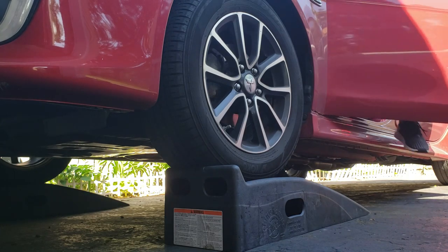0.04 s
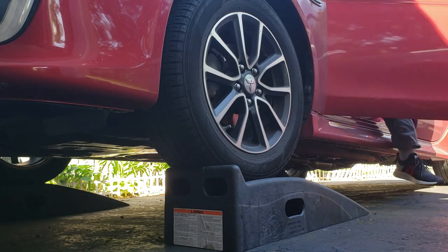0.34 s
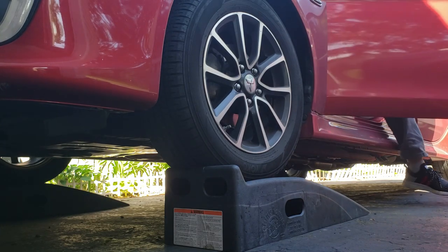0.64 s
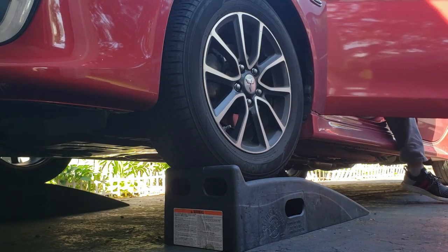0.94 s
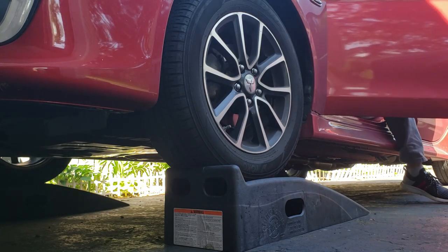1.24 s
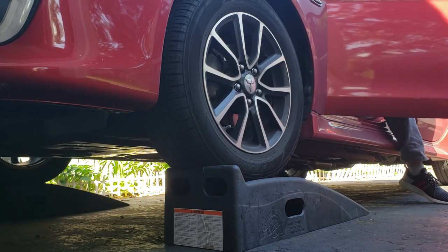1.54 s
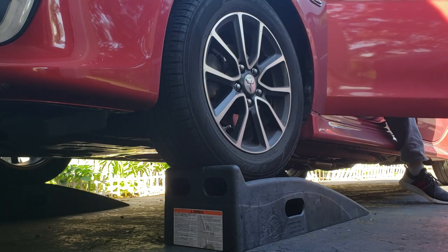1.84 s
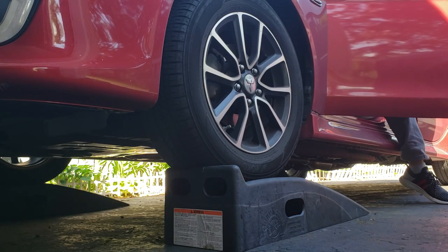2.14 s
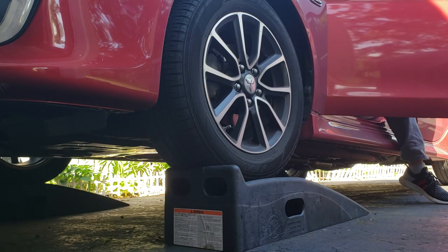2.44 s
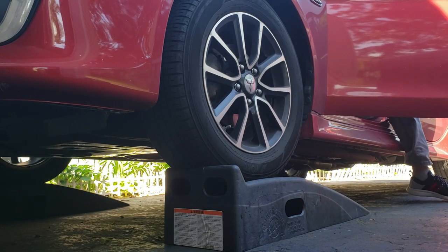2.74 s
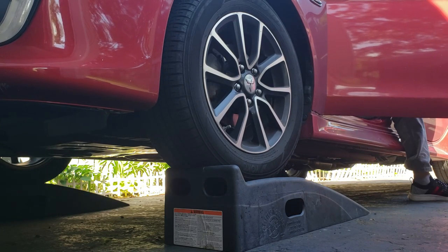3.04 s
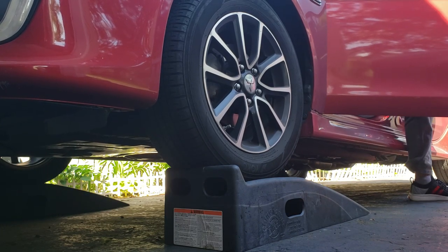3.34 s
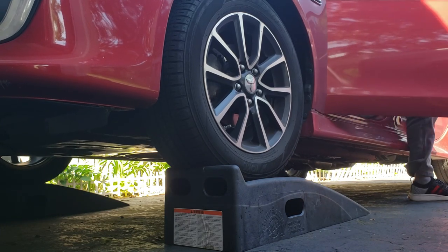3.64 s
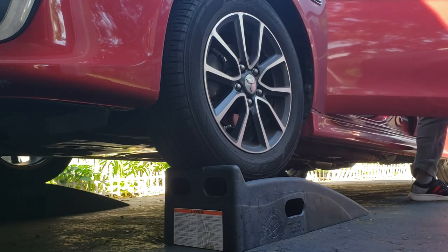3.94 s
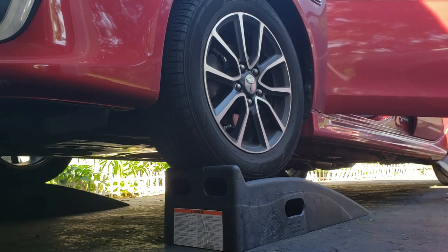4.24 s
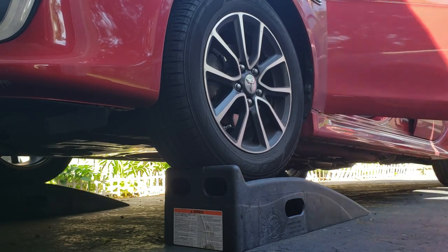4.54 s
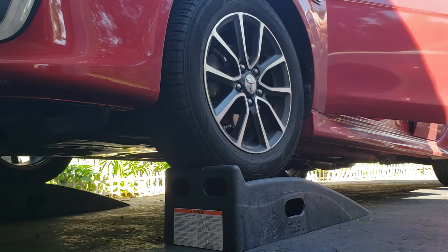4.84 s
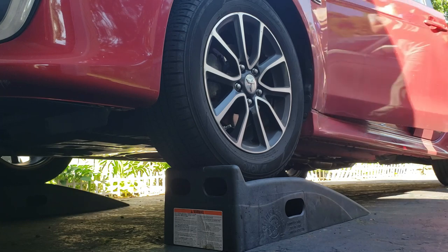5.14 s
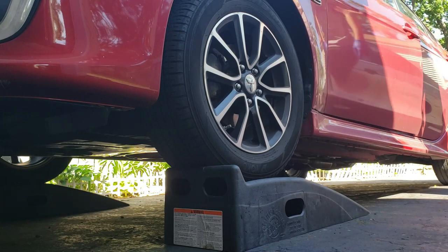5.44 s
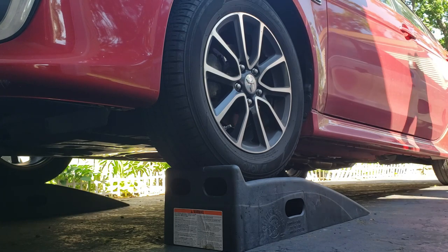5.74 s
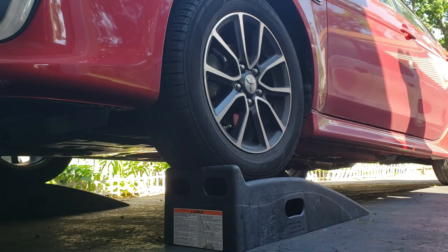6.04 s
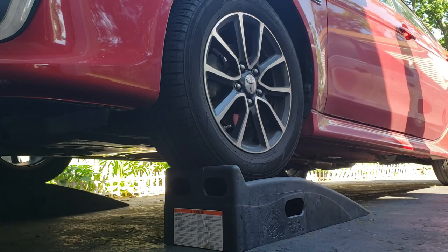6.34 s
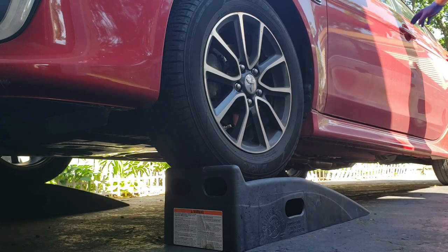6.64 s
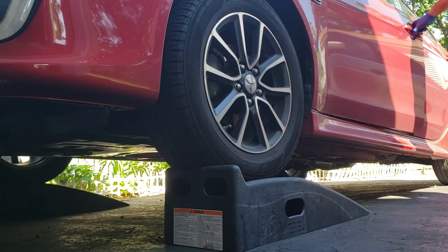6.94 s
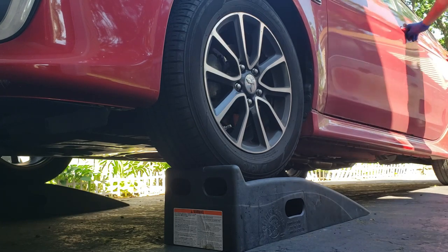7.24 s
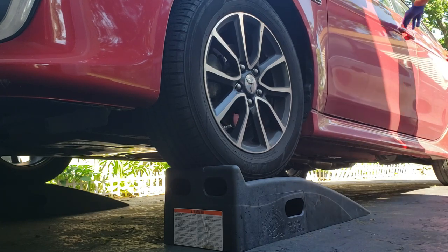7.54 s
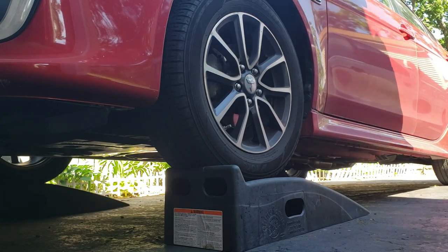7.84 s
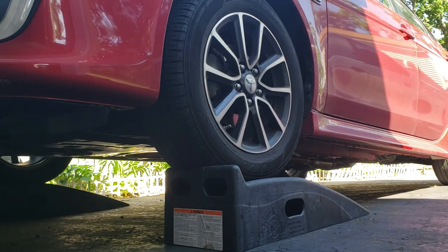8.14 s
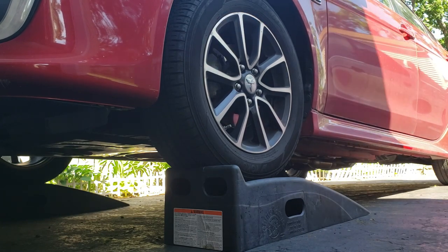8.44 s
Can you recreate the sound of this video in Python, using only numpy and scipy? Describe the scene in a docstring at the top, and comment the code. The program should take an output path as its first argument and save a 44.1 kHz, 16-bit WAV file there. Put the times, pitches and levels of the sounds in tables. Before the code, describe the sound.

A car's bonnet release pops with a ringing steel clunk, followed by a smaller snap. Someone steps over gritty concrete with jingling keys, lets the door close lightly, pulls the handle and then shuts it hard, the latch ringing over a low thud. The sounds are close, heard from beside the front wheel under an outdoor shelter, with soft traffic rumble, a faint far horn at the start and chirping birds behind.

```python
"""Traffic rumbles, a far horn sounds and birds chirp, heard beside the front wheel of a car on ramps
under a shelter. The bonnet catch pops and its lever snaps back, each blow exciting the modes of the
steel panel. Someone steps over gritty concrete, clothes rustling and keys colliding, swings the door
to, pulls the handle and shuts it firmly: the latch rings and the air trapped in the cabin booms.
Shelter and yard return the near sounds as reverberation."""
import sys
import numpy as np
from scipy import signal
from scipy.fft import rfft, irfft, next_fast_len
from scipy.io import wavfile
from scipy.ndimage import uniform_filter1d

SR = 44100
rng = np.random.default_rng(int(sys.argv[2]) if len(sys.argv) > 2 else 0)


def file_out(sig):
    """Save sig as 16-bit WAV at sys.argv[1]."""
    # one column per channel
    cols = np.atleast_2d(sig).T
    # limit, then scale
    lim = np.clip(cols, -1, 1)
    pcm = np.round(lim * 32767).astype(np.int16)
    wavfile.write(sys.argv[1], SR, pcm)


N = 383669
T = np.arange(N) / SR

# Levels are relative: each source applies further gains.
# coherence of the two channels: frequency_hz, correlation
COHERENCE = [(60, 1), (130, 0.98), (290, 0.94), (640, 0.83), (1400, 0), (16000, 0)]
# traffic spectrum, partials of the horn and of a far machine: frequency_hz, level_db
TRAFFIC_SPECTRUM = [(20, -30), (32, -12.5), (42, -1.5), (60, 1.5), (80, 1.5), (110, -3), (160, -10),
                    (215, -14.5), (335, -21.5), (480, -25.5), (760, -29), (1150, -31), (1700, -40.5),
                    (2500, -43.5), (3800, -40), (5500, -59.5), (7200, -47.5), (8400, -66.5), (12200, -54.5),
                    (16000, -54.5)]
HORN_PARTIALS = [(399, 1), (802, -2), (1200, -12)]
HUM_PARTIALS = [(769, -78.5), (462, -79)]
# envelopes of the background sources: time_s, level_db
TRAFFIC_ENVELOPE = [(0, -50.5), (1.0, -53), (2.2, -53), (3.3, -54), (4.7, -54.5), (5.3, -51.5), (6.4, -51),
                    (7.8, -54), (8.3, -53.5), (8.7, -50.5)]
HORN_ENVELOPE = [(0, -69), (.3, -66), (.6, -68.5), (.85, -80), (1.1, -110)]
DRONE_ENVELOPE = [(7.6, -89), (8.0, -52.5), (8.3, -51.5), (8.42, -46.5), (8.5, -43), (8.7, -44.5)]
FLOCK_ENVELOPE = [(0, -76), (.9, -79.5), (1.25, -90), (1.8, -76.5), (2.6, -93), (3.2, -76.5), (4.35, -92),
                  (5, -81), (6.3, -80), (6.55, -92.5), (8.1, -80), (8.7, -98)]
# calls of the nearest birds: start_s, pitch_hz, level_db
BIRD_CALLS = [(0.031, 4100, -68), (.16, 2750, -72), (.48, 4340, -70), (.62, 3780, -72.5),
              (.86, 4200, -70.5), (1.01, 3324, -73.5), (1.39, 4700, -71.5), (1.47, 6900, -79),
              (1.59, 3500, -65.5), (1.809, 3400, -67), (1.97, 4400, -71.5), (2.09, 3400, -70),
              (2.319, 3200, -70.5), (3.749, 3230, -81), (4.701, 3850, -70.5), (4.93, 3500, -71),
              (5.11, 4000, -66.5), (5.441, 3700, -68.5), (5.85, 4200, -70), (6.691, 4050, -69.5),
              (7.949, 2640, -75), (8.05, 3950, -73.5)]
# shoe scuffs and soft rustle of clothes (the faint, long rows at 5.0, 7.74 and 8.36 s):
# start_s, rise_s, fall_s, level_db, dull_weight_db
SCUFFS_AND_RUSTLES = [(1.7, .007, .1, -75.5, 8.5), (3.577, 0.0089, .073, -48.5, -3.5),
                      (3.96, 0.025, 0.32, -67, -10.5), (4.057, 0.004, 0.22, -74, 10.5),
                      (4.493, 0.012, 0.2, -68.5, 0), (4.55, 0.072, 0.11, -62, 10),
                      (5.0, 0.24, 0.31, -69, -8), (5.729, 0.0063, 0.051, -40, -25),
                      (5.85, 0.034, 0.27, -66.5, -10), (5.97, 0.27, 0.12, -56.5, -27),
                      (7.74, 0.03, 1, -71.5, -17), (8.31, 0.017, 0.14, -65.5, 1.5), (8.36, 0.13, 1, -81, 6)]
# spectra of contact noise: frequency_hz, level_db
HEEL_SPECTRUM = [(120, -20), (350, 2.5), (700, -7.5), (1200, -7.5), (1900, -7), (3000, -7.5), (8000, -22)]
SOLE_SPECTRUM = [(900, -17), (1900, -11), (2600, -2.5), (3700, -3.5), (5500, -5), (7200, -4.5),
                 (8500, -19.5), (15000, -16.5)]
GRIT_SPECTRUM = [(2000, -10.5), (5000, -3), (7000, -10.5), (9000, -10), (12000, -7.5), (15500, -13.5)]
KEY_SPECTRUM = [(1500, -11.5), (3200, -1), (5200, -2), (7100, -4.5), (9000, -9), (12000, -5.5), (15500, -6)]
# jingles of the bunch of keys: start_s, length_s, level_db
JINGLES = [(4.186, 0.047, -56), (6.043, .15, -48)]
# single key clinks, blows on the latch, booms as the seals close: start_s, level_db
KEY_CLINKS = [(2.976, -63), (3.02, -64), (4.023, -56), (4.178, -56), (4.247, -58), (6.008, -51.5),
              (6.017, -42), (6.199, -41.5), (7.874, -52), (8.378, -59.5)]
LATCH_HITS = [(5.603, -29), (6.934, -33.5), (7.341, -27.5)]
CABIN_BOOMS = [(5.725, -45), (7.341, -16), (7.379, -20.5)]
# rattles of the pawl in the latch: start_s, level_db, t60_s
PAWL_HITS = [(5.705, -34, 0.2), (6.933, -32.5, 0.019), (7.071, -47, 0.023)]
# normal modes: frequency_hz, level_db, t60_s
KEY_MODES = [(3200, 1, .025), (4200, -2, .025), (5750, -6, .04), (6950, 0, .06), (7300, -3, .05),
             (10900, -5, .07), (11600, -7, .05), (12500, -2, .07), (13350, -3, .07), (14300, -7, .05),
             (15400, -4, .05)]
LATCH_MODES = [(582, -1, .07), (790, 0, .048), (1380, -2, .035)]
PAWL_MODES = [(2610, -1, .07), (2950, -3, .08), (3330, -1, .09), (4360, 2, .025), (5500, -5, .04)]
BONNET_MODES = [(75, -10.5, .4), (81.2, -11, 0.44), (113.3, -8.5, 0.54), (133.4, -10.5, 0.57),
                (191.8, -9, 0.49), (238, 1, 0.24), (245, 9.5, 0.25), (282, 0.5, 0.23), (426, -1.5, 0.18),
                (456.9, -3, 0.34), (669, -4.5, .28), (709, -6, 0.25), (977, -15, 0.44), (1144, -5.5, 0.16),
                (1250, -30.5, 0.27), (1290, -10, .3), (1410, -12.5, 0.26), (1550, -12, .2),
                (4400, -13, 0.31), (7700, -12.5, .25), (6900, -14.5, 0.267), (7900, -16.5, .25)]
DOOR_MODES = [(71.8, -5, 0.34), (104, 0, 0.1), (127.3, 1, 0.15), (162.2, -2.5, 0.28), (185.4, 3, 0.15),
              (225.4, -3.5, 0.12), (301.5, -2, 0.067), (380, -10, 0.33), (453, -6.5, 0.12),
              (571, -8.5, 0.062), (662, -10, 0.07), (791, -20, 0.18), (1096, -11, 0.11), (1190, -21, 0.13),
              (1280, -10, 0.094)]
# dense ring of sheet metal and catch: frequency_hz, level_db
BONNET_SPECTRUM = [(60, 1.5), (300, 10), (700, -5.5), (1300, -8.5), (2100, -11), (2550, -19), (3200, -12),
                   (4500, -1), (5700, -8.5), (7300, -3.5), (8500, -24), (15500, -20.5)]
DOOR_SPECTRUM = [(50, 13.5), (120, 21.5), (300, 11), (700, -2.5), (1400, -4.5), (2700, -15), (4400, -6.5),
                 (5800, -11), (7000, -17.5), (8500, -37), (15500, -32)]
# boundaries between the five bands of a blow: frequency_hz
BAND_EDGES_HZ = [200, 900, 3000, 8000]
# weights of those bands: boom_db, body_db, clank_db, click_db, tick_db
BONNET_BANDS_DB = [1.4, -0.086, 0.28, 0.87, -0.74]
DOOR_BANDS_DB = [0.078, 0.26, 0.27, -1.1, -1.3]
# blows on the panels: start_s, force_db, boom_over_body_db, hardness_db_per_band, ring_t60_s
BONNET_BLOWS = [(2.372, -57, 14, -7, 0.99), (2.407, -27, 8, -0.96, 0.087), (2.419, -19.5, -5.5, -11, 0.28),
                (2.440, -27, 3.5, -7, 0.26), (2.480, -34.5, 0.5, -11.5, 0.52), (2.681, -37, -11, -1.5, 0.2),
                (2.696, -31, -10, -8.5, 0.36)]
DOOR_BLOWS = [(5.199, -53.5, -14, -16, 0.12), (5.555, -42, -16, -10, 0.74), (5.602, -32, -3.5, -8, 0.31),
              (5.725, -48, 9.5, -6, 0.78), (6.885, -49, 9.5, -7.5, 0.11), (6.894, -35.5, -8.5, -13, 0.74),
              (6.934, -31.5, 3.5, -10.5, 0.063), (6.952, -38, 4, -7.5, 0.41), (7.071, -29, 0.5, -9.5, 0.19),
              (7.122, -42.5, 6.5, -10, 0.47), (7.328, -31.5, -11, -6, 0.15),
              (7.339, -26.5, -22, -5.5, 0.21), (7.345, -23, 5, -13.5, 0.18), (7.379, -32, 10.5, -9, 0.29),
              (8.309, -49, -6, -12.5, 0.08)]


def undb(db):
    """Amplitude ratio of a level in decibels."""
    return 10 ** (np.asarray(db) / 20)


def unit(x):
    """Normalisation to rms 1."""
    return x / np.sqrt(np.mean(x ** 2) + 1e-20)


def fade(t, t60):
    """Exponential damping, 60 dB down after t60 seconds."""
    return np.exp(-np.log(1000) * t / max(t60, 1e-3))


def onset(t, rise_s):
    """First-order build-up towards 1."""
    return 1 - np.exp(-t / rise_s)


def curve(rows, at_s=T):
    """Linear interpolation of rows of time_s, value."""
    return np.interp(at_s, *np.transpose(rows))


def on_bins(points, size):
    """Log-frequency interpolation of rows of frequency_hz, value at each Fourier bin."""
    hz, value = np.transpose(points)
    return np.interp(np.log(np.arange(size // 2 + 1) * SR / size + 1), np.log(hz), value)


def colour(x, spectrum):
    """Filtering by multiplication in the frequency domain."""
    size = x.shape[-1]
    return irfft(rfft(x) * undb(on_bins(spectrum, size)), size)


def diffuse_noise(size):
    """A diffuse field at two points: coherent in the bass, independent in the treble."""
    mid, side = rfft(rng.standard_normal((2, size)))
    alike = np.clip(on_bins(COHERENCE, size), -1, 1)
    mid, side = mid * np.sqrt(1 + alike), side * np.sqrt(1 - alike)
    return unit(irfft(np.array([mid + side, mid - side]), size))


def shaped_noise(size, spectrum):
    """Filtered diffuse noise of rms 1."""
    return unit(colour(diffuse_noise(size), spectrum))


def add(out, start_s, x):
    """Superposition of x on out from start_s."""
    start = max(int(start_s * SR), 0)
    out[:, start:start + x.shape[-1]] += x[..., :N - start]


def pan(left_db):
    """Channel gains for a level difference, left minus right."""
    return undb(np.array([[left_db], [-left_db]]) / 2)


def from_right(x, lag_samples=12):
    """Path difference: sound from the right reaches the left channel later."""
    return np.array([np.pad(x[0], (lag_samples, 0))[:N], x[1]])


def scattered(start_s, length_s, per_s):
    """Stratified random times, one in each slot of about 1 / per_s seconds."""
    count = max(round(length_s * per_s), 1)
    return start_s + length_s * (np.arange(count) + rng.random(count)) / count


def ring(modes, t, scatter_db):
    """Free vibration as a sum of damped modes: random weights, phases scattered more in the treble."""
    out = 0
    for hz, db, t60 in modes:
        weight, lag, start = rng.standard_normal(3)
        phase = (2 * start + np.array([[1], [-1]]) * lag) * min(hz / 1500, 2)
        out = out + undb(db + scatter_db * weight) * fade(t, t60) * np.sin(2 * np.pi * hz * t + phase)
    return out


def reverberation(x, t60, top_t60):
    """Convolution with diffuse reflections of unit energy that die sooner in the treble."""
    t = np.arange(SR * 3 // 2) / SR
    noise = diffuse_noise(len(t))
    low = colour(noise, [(2000, -6.5), (12000, -16)])
    tail = (low * fade(t, t60) + (noise - low) * fade(t, top_t60)) * np.clip(t / 0.017, 0, 1)
    return signal.fftconvolve(x, unit(tail) / np.sqrt(len(t)), axes=1)[:, :N]


def traffic(waver, waver_db=1.04):
    """Broadband rumble under slow amplitude modulation."""
    rumble = shaped_noise(next_fast_len(N), TRAFFIC_SPECTRUM)[:, :N]
    return rumble * undb(curve(TRAFFIC_ENVELOPE) + waver_db * waver)


def horn(clock):
    """A far horn: three nearly harmonic partials under one envelope."""
    tone = unit(sum(undb(db) * np.sin(2 * np.pi * hz * clock) for hz, db in HORN_PARTIALS))
    return tone * undb(curve(HORN_ENVELOPE))


def machine_hum(clock, waver, waver_db=3.2):
    """A far machine: two partials under slow amplitude modulation."""
    return sum(undb(db + waver_db * waver) * np.sin(2 * np.pi * hz * clock) for hz, db in HUM_PARTIALS)


def yap(peak_s=0.15, width_s=0.056, level_db=-56):
    """One distant yap: a formant of noise in a Gaussian envelope."""
    formant = [(350, -23), (560, -2), (850, 0), (1050, -7), (1500, -29), (4000, -56)]
    voice = shaped_noise(next_fast_len(N), formant)[:, :N]
    return voice * undb(level_db) * np.exp(-((T - peak_s) / width_s) ** 2)


def drone(pitch_hz=48.4):
    """A low pure tone that swells near the end."""
    return unit(np.sin(2 * np.pi * pitch_hz * T)) * undb(curve(DRONE_ENVELOPE))


def street(pitch_drift=0.0034):
    """Superposition of far sources; one slow random modulation sways traffic, horn and hum."""
    waver = np.interp(T, np.linspace(0, T[-1], 60), rng.standard_normal(60))
    clock = np.cumsum(1 + pitch_drift * waver) / SR
    return traffic(waver) + horn(clock) + machine_hum(clock, waver) + yap() + drone()


def birds(chirp_s=.11, arch=.12, flock_hz=4250, flock_octaves=.8):
    """Frequency modulation makes raspy arched chirps; a longer answer to each is heard as reflections."""
    near, far = np.zeros((2, 2, N))
    flock = [(s, flock_hz * 2 ** (flock_octaves * rng.triangular(-1, 0, 1)), curve(FLOCK_ENVELOPE, s))
             for s in scattered(0, T[-1], per_s=18)]
    for start_s, pitch_hz, db in BIRD_CALLS + flock:
        glide = .07 * rng.standard_normal()
        for out, stretch, warble in ((near, 1, .04), (far, 2.2, .13)):
            progress = np.linspace(0, 1, int(stretch * chirp_s * SR))
            swell = np.sin(np.pi * progress)
            rasp = unit(uniform_filter1d(rng.standard_normal(SR // 2), size=50))[:len(progress)]
            hz = pitch_hz * (1 + glide * (progress - .5) + warble * rasp + arch * (swell - 2 / np.pi))
            chirp = 2 * swell * np.sin(2 * np.pi * np.cumsum(hz) / SR)
            add(out, start_s - (stretch - 1) * chirp_s / 2, undb(db - 2) * chirp)
    return undb(-5) * near + reverberation(near + undb(-4) * far, t60=.5, top_t60=0.46)


def shoes_and_clothes(grit_db=-7.5, grain_samples=32):
    """Friction noise: shoe scuffs and soft rustle of clothes, three grainy layers following pressure."""
    forces = np.zeros((3, 2, N))
    t = np.arange(SR * 3 // 2) / SR
    for start_s, rise_s, fall_s, db, dull_db in SCUFFS_AND_RUSTLES:
        pressure = undb(db) * np.minimum(t / rise_s, 1) * np.exp(-2 * np.maximum(t - rise_s, 0) / fall_s)
        for force, share_db in zip(forces, (dull_db, 0, grit_db)):
            add(force, start_s, undb(share_db) * pan(left_db=0.5) * pressure)
    out, size = 0, next_fast_len(N)
    textures = (HEEL_SPECTRUM, 3), (SOLE_SPECTRUM, 3), (GRIT_SPECTRUM, 1.5)
    for force, (spectrum, spread_db) in zip(forces, textures):
        grain_db = spread_db * np.minimum(rng.exponential(size=size // grain_samples + 1), 4)
        grains = np.repeat(undb(grain_db), grain_samples)[:size]
        out = out + force * unit(colour(diffuse_noise(size) * grains, spectrum))[:, :N]
    return out


def keys(rattle_db=-8, rattle_s=0.016):
    """Each collision excites a bright tick and randomly detuned modes; two weaker contacts follow."""
    out, t = np.zeros((2, N)), np.arange(SR // 8) / SR
    jingling = [(s, db + 0.5 * rng.standard_normal())
                for start_s, length_s, db in JINGLES for s in scattered(start_s, length_s, per_s=50)]
    for start_s, db in KEY_CLINKS + jingling:
        for rebound in (False, True, True):
            tick = shaped_noise(len(t), KEY_SPECTRUM) * fade(t, t60=0.034)
            modes = [(hz * (1 + .02 * rng.standard_normal()), level, t60) for hz, level, t60 in KEY_MODES]
            clink = (undb(-4) * ring(modes, t, scatter_db=4) + undb(6) * tick) / 2
            add(out, start_s + rebound * rattle_s * rng.random(), undb(db + rattle_db * rebound) * clink)
    return out


def latch():
    """Impacts excite the modes of the latch and of its pawl, which also rattles with a burst of noise."""
    out, t = np.zeros((2, N)), np.arange(SR // 2) / SR
    for start_s, db in LATCH_HITS:
        add(out, start_s, undb(db) * ring(LATCH_MODES, t, scatter_db=1.5) * onset(t, rise_s=0.00041))
    for start_s, db, t60 in PAWL_HITS:
        rattle = ring(PAWL_MODES, t, scatter_db=1.5) + undb(-1) * shaped_noise(len(t), SOLE_SPECTRUM)
        add(out, start_s, undb(db) * rattle * fade(t, t60) * onset(t, rise_s=0.0017))
    return out


def cabin_boom(pitch_hz=47.5, t60=.23):
    """Cavity resonance: air trapped by the door seals rings in one low damped mode."""
    out, t = np.zeros((2, N)), np.arange(SR // 2) / SR
    boom = np.sin(2 * np.pi * pitch_hz * t) * fade(t, t60) * onset(t, rise_s=0.0076)
    for start_s, db in CABIN_BOOMS:
        add(out, start_s, undb(db) * boom)
    return out


def struck_panel(blows, bands_db, modes, spectrum, dense_db, crack_db, crack_t60, bloom_s,
                 bass_t60_ratio, left_db, treble_left_db):
    """Impact on steel: a crack, a dense ring and modes. Harder blows are brighter; bass builds last."""
    out, t = np.zeros((2, N)), np.arange(SR * 3 // 4) / SR
    edges_hz = [42] + BAND_EDGES_HZ + [18000]
    filters = [signal.butter(2 if k < 2 else 4, edges_hz[k:k + 2], "band", fs=SR, output="sos")
               for k in range(5)]
    for start_s, force_db, boom_db, hardness_db, t60 in blows:
        dense = undb(dense_db) * shaped_noise(len(t), spectrum)
        tone = ring(modes, t, scatter_db=3.5) * fade(t, 5 * t60)
        for k, share_db in enumerate(bands_db):
            db = force_db + share_db + (hardness_db * (k - 1) if k else boom_db)
            decay = fade(t, t60 * (bass_t60_ratio if k < 2 else 1)) + undb(crack_db) * fade(t, crack_t60)
            vibration = (tone + dense * decay) * onset(t, bloom_s / (k + 1) ** 2)
            band = signal.sosfilt(filters[k], vibration)
            band /= np.sqrt(np.mean(band[:, :SR // 40] ** 2))  # the first 25 ms set the level
            add(out, start_s, band * undb(db) * pan(left_db + treble_left_db * (k > 2)))
    return out


def door():
    """Impacts set the door panel vibrating as it is pushed to, opened by its handle and slammed."""
    return struck_panel(DOOR_BLOWS, DOOR_BANDS_DB, DOOR_MODES, DOOR_SPECTRUM,
                        dense_db=-1, crack_db=3, crack_t60=0.072, bloom_s=0.0026,
                        bass_t60_ratio=0.99, left_db=-0.5, treble_left_db=1.5)


def bonnet():
    """Impacts of the catch and its lever set the bonnet vibrating, a little to the left."""
    return struck_panel(BONNET_BLOWS, BONNET_BANDS_DB, BONNET_MODES, BONNET_SPECTRUM,
                        dense_db=9, crack_db=-2.5, crack_t60=0.064, bloom_s=.014,
                        bass_t60_ratio=0.69, left_db=1.1, treble_left_db=4)


def scene():
    """Direct and reverberant sound of car, shoes, clothes and keys add to the street and the birds."""
    outdoors = from_right(street()) + birds()
    car = undb(-3) * bonnet() + from_right(undb(-1) * door() + latch() + cabin_boom())
    near = car + shoes_and_clothes() + keys()
    shelter = undb(-11) * reverberation(near, t60=0.43, top_t60=0.28)
    yard = undb(-27) * reverberation(near, t60=2.0, top_t60=0.45)
    return near + shelter + yard + outdoors


def record(dry, low_hz=31, top_hz=16100):
    """Band limiting removes the deepest rumble and the highest treble."""
    thinned = signal.sosfilt(signal.butter(4, low_hz, "high", fs=SR, output="sos"), dry)
    return signal.sosfilt(signal.ellip(10, .2, 70, top_hz, fs=SR, output="sos"), thinned)


dry = scene()
out = record(dry)
file_out(out)
```